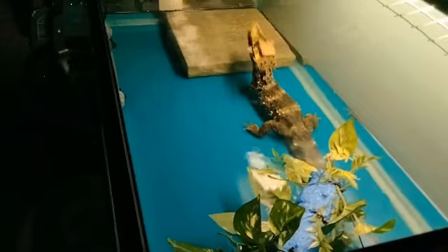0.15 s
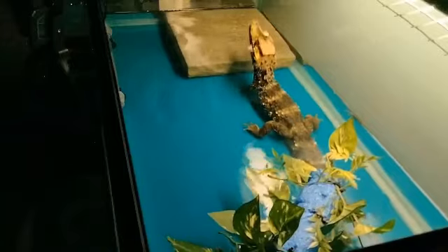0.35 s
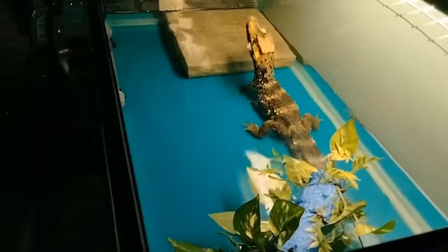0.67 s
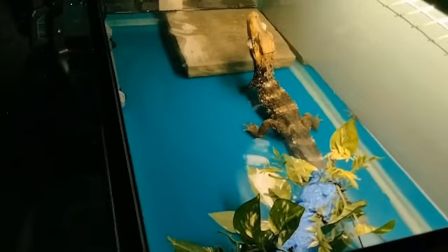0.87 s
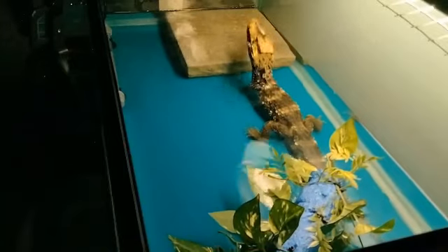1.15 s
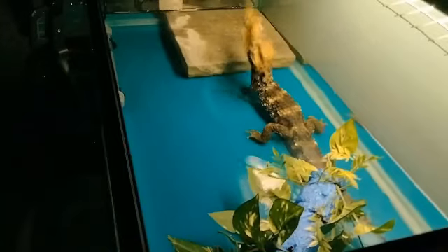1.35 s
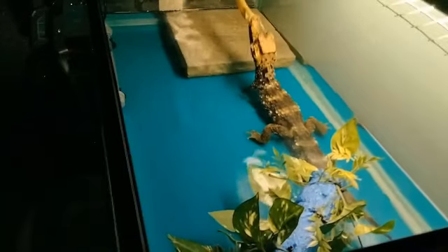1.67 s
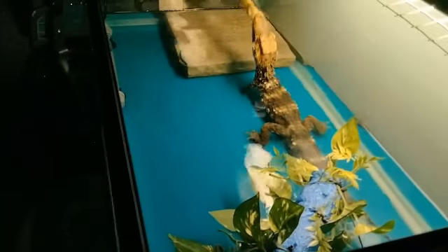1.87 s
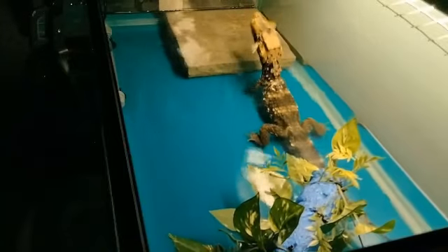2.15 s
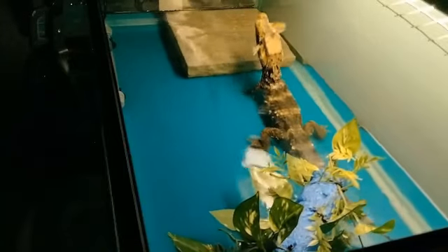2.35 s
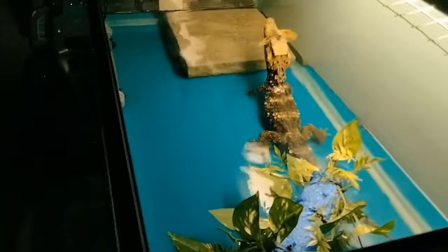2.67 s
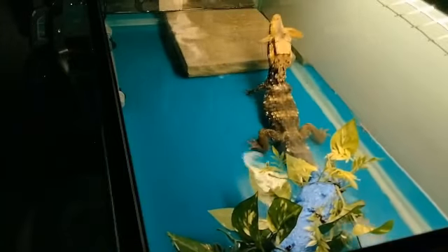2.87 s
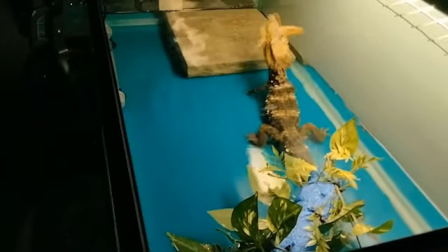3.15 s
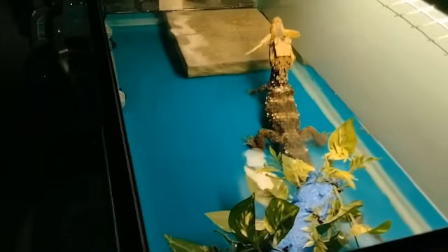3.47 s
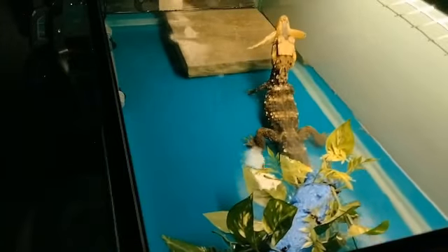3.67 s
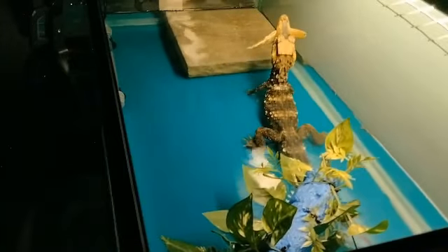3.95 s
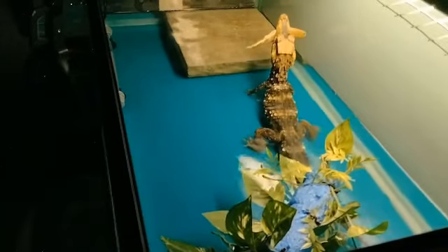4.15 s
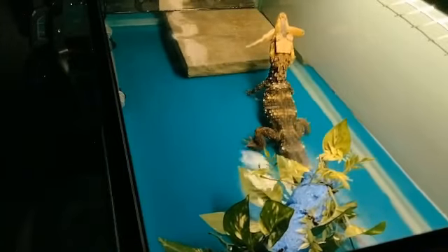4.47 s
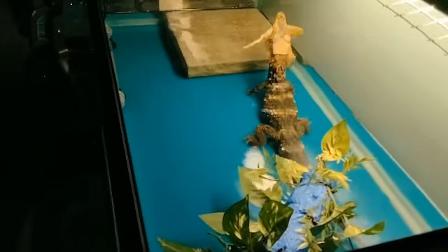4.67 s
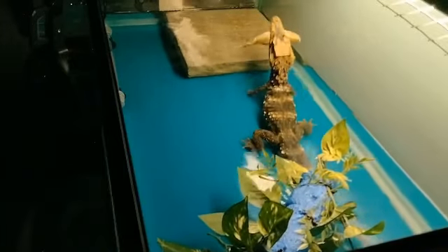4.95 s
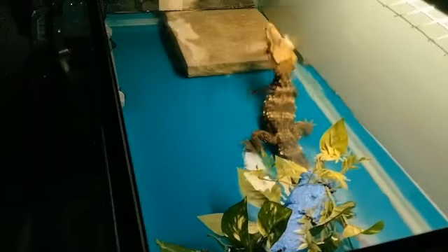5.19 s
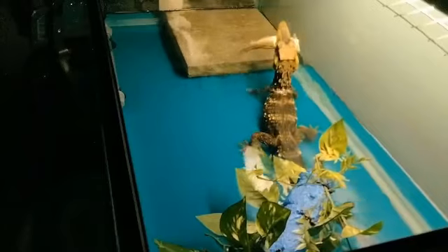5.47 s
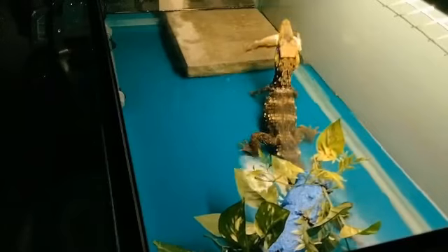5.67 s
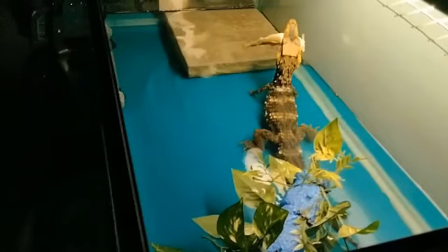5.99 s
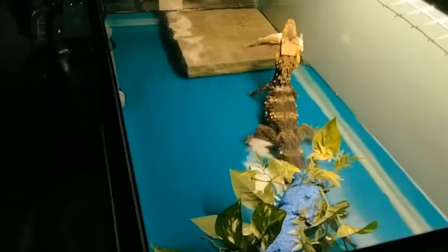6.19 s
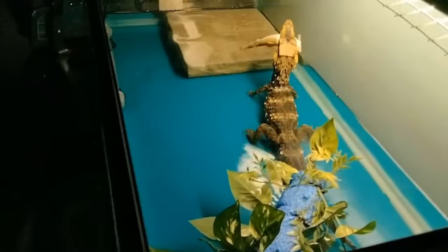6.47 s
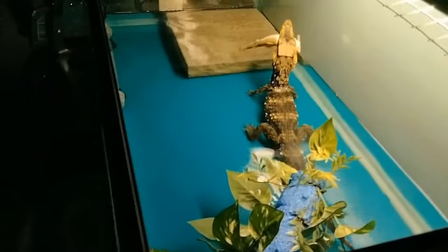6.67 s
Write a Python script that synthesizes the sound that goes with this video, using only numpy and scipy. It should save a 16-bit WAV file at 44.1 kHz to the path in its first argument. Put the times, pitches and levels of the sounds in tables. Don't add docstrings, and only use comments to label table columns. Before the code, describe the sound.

A small crocodilian crunches a fish in a shallow indoor tank. One loud dry crack comes early, a cluster of sharp snaps and crunch midway, and a last crunch near the end, with tiny bubble plops. Steady low hum, airy hiss and faint pump whine continue; soft air puffs come in pairs. Stereo phone microphones, short hard-walled reverberation.

```python
import sys
import numpy as np
from scipy import signal
from scipy.fft import rfft, irfft, next_fast_len
from scipy.io import wavfile
from scipy.ndimage import uniform_filter1d, map_coordinates

SR = 44100
rng = np.random.default_rng(int(sys.argv[2]) if len(sys.argv) > 2 else 0)


def ratio(d):
    e = np.asarray(d, float) / 20
    return 10 ** e


def pcm_store(signal):
    levels = np.round(np.clip(np.atleast_2d(signal), -1, 1) * 32767)
    wavfile.write(sys.argv[1], SR, levels.astype(np.int16).T)


N = 301189

MAINS_HZ, FAN_HZ, PUMP_HZ = 60.0, 50.52, 29.34

# mains multiple, fan multiple, pump multiple, level/dB
HUM_TONES = [(0, 1, 0, -50.5), (0, 4, 0, -62.5), (0, 6, 0, -63), (1, 0, 0, -73), (2, 0, 0, -52.5),
             (4, 0, 0, -60.5), (6, 0, 0, -66.5), (2, 2, 0, -71), (2, 3, 0, -69.5), (2, 4, 0, -75),
             (2, 5, 0, -72), (4, -1, 0, -70.5), (4, 1, 0, -78), (0, 0, 2, -60.5), (0, 0, 8, -65),
             (0, 0, 10, -62), (0, 0, 12, -63.5)]
# f/Hz, width/Hz, level/dB
PUMP_MODES = [(2052, 10.4, 2), (2370, 17, 0), (2442, 100, -17.5), (4280, 48.6, -13)]
# f/Hz, width/Hz, level/dB
LAMP_MODES = [(9300, 120, -8.5), (9940, 90, -12), (7060, 500, -4)]
# f/Hz, level per Hz/dB
RUMBLE_SPECTRUM = [(20, -12), (50, -1.5), (100, -2), (150, -5), (260, -2.5), (400, -8), (700, -18.5),
                   (1100, -23.5), (1700, -20.5), (3000, -41)]
# f/Hz, level per Hz/dB
HISS_SPECTRUM = [(700, -14), (1800, -9), (2050, 3.5), (2450, -2), (2750, -14), (3500, 0), (4100, -5),
                 (5100, 0.5), (5700, -8), (6100, -12.5), (7000, -11), (10500, -25), (13000, -25),
                 (16000, -21.5)]
# f/Hz, correlation
ROOM_CORRELATION = [(60, 0.42), (180, 0.62), (550, 0.66), (1650, -0.069), (4970, 0.023), (15000, -0.16)]
# f/Hz, left minus right/dB
ROOM_LEAN = [(60, 1), (240, 0.5), (950, -8), (3770, -3), (15000, -5.5)]
# t/s, level/dB
MURMUR_LEVEL = [(0.0, -56), (0.7, -55.5), (1.2, -61), (2.3, -58), (3.3, -61), (3.8, -58), (4.7, -62),
                (5.3, -59), (5.6, -63), (6.83, -62)]
# f/Hz, t60/s
TANK_T60 = [(500, 0.47), (3000, 0.21), (8000, .19), (15000, 0.13)]
# t/s, peak level/dB, strongest f/Hz, left minus right/dB, tank answer/dB
TOOTH_SNAPS = [(.173, -36, 8700, -2, -8), (0.4188, -7.5, 5300, -2, -2.5), (0.421, -15.5, 9400, -12, -3.5),
               (1.0704, -48, 12000, -3, 3), (1.2244, -48, 9000, -2, -8), (2.0304, -49, 9000, -1, 2),
               (2.485, -47, 10000, -4, 4), (2.5068, -30, 5500, -4, -2), (2.5784, -17.5, 5300, 1, -4),
               (3.24, -50, 9000, -3, 2), (4.79, -43, 13400, -7, -1), (4.8267, -43, 9500, -3, 1),
               (5.5322, -27.5, 7000, -15, 5)]
# t/s, peak level/dB, strongest f/Hz, left minus right/dB, tank answer/dB
SPLINTERS = [
    (1.149, -44, 6500, 9, -12),
    (1.4293, -40, 7240, 7, 4),
    (1.47, -35.5, 5300, -3, -5),
    (2.5895, -20, 7000, 4, -8),
    (2.6466, -23.5, 7500, 1, -7),
    (3.2785, -33, 4900, 6, 2),
    (3.297, -37, 3080, 3, -6),
    (5.52, -26, 9500, -9, 2.5),
]
# f/Hz, level/dB
BONE_SPECTRUM = [(500, -36), (1500, -11.5), (2200, -10), (2800, 1.5), (3500, 0.5), (6000, 0.5),
                 (8000, -1.5), (10000, 0.5), (12000, -1), (15000, 0), (16500, -13)]
# t/s, level/dB, f/Hz, t60/s, splash share 0-1
BUBBLES = [(0.213, -39.5, 1540, 0.039, .15), (.421, -50, 1710, .08, 0.6), (.423, -51, 1000, .12, .9),
           (.423, -48.5, 613, 0.13, 0.5), (2.488, -43, 1228, 0.075, 0.53), (2.489, -50, 840, .06, .8),
           (2.577, -39, 600, 0.023, .95), (2.584, -43, 2000, .09, .9), (2.649, -47.5, 1750, 0.053, 0.6),
           (3.297, -42, 3040, 0.074, 0.45), (5.257, -45.5, 620, .11, 0.6), (5.258, -51, 1010, 0.097, 0.5),
           (5.262, -50, 415, 0.084, 0.3), (5.528, -46.5, 958, 0.052, .5), (5.521, -48, 1440, .06, .6),
           (5.575, -51, 560, 0.081, 0.6)]
# valve shuts t/s, stays open/s, level/dB
AIR_PUFFS = [
    (.73, .13, -45),
    (.965, .115, -44),
    (2.185, .12, -45),
    (2.425, .11, -44.5),
    (3.83, .135, -45),
    (4.072, .11, -44.5),
    (5.322, .125, -46.5),
    (5.56, .11, -45),
    (6.83, .11, -44),
]
# f/Hz, level/dB
PUFF_BODY_SPECTRUM = [(300, -25), (600, -12), (1750, -8), (2000, 2.5), (2700, -3), (4300, 1), (5500, -2.5),
                      (6200, -12.5), (7600, -14.5), (8200, -67)]
# f/Hz, level/dB
PUFF_JET_SPECTRUM = [(8300, -44), (9400, -8), (10500, -0.5), (11500, 11.5), (13500, 8), (15200, 12.5),
                     (16500, -20.5)]
# peak t/s, level/dB, rise/s per 20 dB, fall/s per 20 dB, left minus right/dB
GRINDING = [
    (1.43, -55, .015, .07, -2),
    (2.054, -49.5, .04, .06, -.5),
    (2.509, -44.5, .003, .11, -3),
    (2.584, -36, .005, .085, -3),
    (3.292, -42, .031, .04, -1),
    (4.868, -52.5, .09, .09, -.5),
    (5.314, -52, .1, .06, -4),
    (5.526, -33.5, .015, .072, 4),
]


def unit(x):
    return x / np.sqrt(np.mean(x ** 2) + 1e-20)


def along(points, hz):
    f, value = np.transpose(points)
    return np.interp(np.log(hz + 1), np.log(f + 1), value)


def wobble(rate):
    knots = rng.standard_normal(int(N * rate / SR) + 4)
    return map_coordinates(knots, [np.arange(N) * rate / SR])


def filtered(x, response):
    m = next_fast_len(x.shape[-1] + 8192)
    spectrum = rfft(x, m) * response(np.fft.rfftfreq(m, 1 / SR))
    return irfft(spectrum, m)[..., :x.shape[-1]]


def sides(lean_db):
    return ratio(np.array([lean_db / 2, -lean_db / 2]))


def rush(gain, correlation):
    def mid_side_gain(hz):
        angle = np.arccos(np.clip(along(correlation, hz), -1, 1)) / 2
        return gain(hz) * [np.cos(angle), np.sin(angle)]

    mid, side = filtered(rng.standard_normal((2, N)), mid_side_gain)
    return unit(np.array([mid + side, mid - side]))


def peaks(modes):
    return lambda f: sum(ratio(db) / (1 + ((f - hz) / width) ** 2) for hz, width, db in modes)


def swell(peak_s, hold_s, rise, fall):
    t = np.arange(N) / SR - peak_s
    level_db = np.minimum(rise * (t + hold_s), -fall * t)
    return ratio(np.clip(level_db, -90, 0))


def machines():
    t = np.arange(N) / SR
    tones = np.zeros((2, N))
    for mains, fan, pump, db in HUM_TONES:
        hz = mains * MAINS_HZ + fan * FAN_HZ + pump * PUMP_HZ
        lag = rng.normal(0, hz / 900) * np.array([[.5], [-.5]])
        tones += np.sqrt(2) * ratio(db) * np.sin(2 * np.pi * (hz * t + rng.random()) + lag)
    tones *= ratio(0.81 * wobble(2.84))

    throb = 1 + 0.55 * np.cos(2 * np.pi * PUMP_HZ * t)
    whine = ratio(-58.5) * throb * rush(peaks(PUMP_MODES), ROOM_CORRELATION)
    lamp = ratio(-66) * rush(peaks(LAMP_MODES), ROOM_CORRELATION)

    rumble = rush(lambda f: ratio(along(RUMBLE_SPECTRUM, f)), ROOM_CORRELATION)
    rumble = ratio(-53 + 0.29 * wobble(1.91)) * rumble
    gap = lambda f: 1 - .8 * np.exp(-((f - 8600) / 620) ** 6)
    hiss = rush(lambda f: ratio(along(HISS_SPECTRUM, f)) * gap(f), ROOM_CORRELATION)
    hiss = ratio(-51.5 + .9 * wobble(3)) * hiss
    return filtered(tones + whine + lamp + rumble + hiss, lambda f: sides(along(ROOM_LEAN, f)))


def murmur():
    s, db = np.transpose(MURMUR_LEVEL)
    lumps = ratio(np.interp(np.arange(N) / SR, s, db) - 0.5 + 2.5 * wobble(14))
    modes = lambda f: 1 / (1 + ((f - 520) / 90) ** 2) + .5 / (1 + ((f - 950) / 350) ** 2)
    return lumps * rush(modes, [(500, 0.13)])


def tank(x):
    hz, t, z = signal.stft(rng.standard_normal((2, SR // 3)), SR, nperseg=256)
    patches = uniform_filter1d(rng.standard_normal(z.shape[1:]), size=4, axis=0)
    patches = uniform_filter1d(patches, size=5, axis=1)
    walls = ratio(-60 * t / along(TANK_T60, hz)[:, None])
    room = ratio(-27 - 60 * t / 0.49) / (1 + (hz[:, None] / 1800) ** 4)
    decay = (walls + room) * ratio(3.5 * unit(patches))
    tail = signal.istft(z * decay, SR, nperseg=256)[1]
    tail = tail * np.clip(np.arange(tail.shape[1]) / SR / 0.0052, 0, 1)
    return signal.fftconvolve(x, tail / np.linalg.norm(tail[0]), axes=1)


def snaps():
    out, t = np.zeros((2, N + SR)), np.arange(SR // 40) / SR
    breaks = [(0.55, *row) for row in TOOTH_SNAPS] + [(0.18, *row) for row in SPLINTERS]
    for broad, s, db, hz, lean_db, wet_db in breaks:
        burst = rng.standard_normal((2, len(t))) * ratio(-20 * t / .002) * (1 - np.exp(-t / .0002))
        bone = lambda f: broad * ratio(along(BONE_SPECTRUM, f))
        splinter = lambda f: 1j * f * 0.26 * hz / (hz * hz - f * f + 1j * f * 0.21 * hz)
        crack = filtered(burst, lambda f: bone(f) / (1 + (f / 11000) ** 2) + splinter(f))
        crack = ratio(db + 4) * crack / np.abs(crack).max(axis=1, keepdims=True)

        walls = filtered(tank(np.ones((2, 1))), lambda f: bone(f) + .5 * np.abs(splinter(f)))
        walls = ratio(wet_db + 5) * walls * np.linalg.norm(crack) / np.linalg.norm(walls)

        start = round(s * SR)
        out[:, start:start + len(t)] += crack * sides(lean_db)[:, None]
        out[:, start:start + walls.shape[1]] += walls * sides(.5 * lean_db)[:, None]
    return filtered(out[:, :N], lambda f: sides(-2.5 * np.log2((f + 500) / 6000)))


def plops():
    out, t = np.zeros((2, N + SR)), np.arange(SR // 5) / SR
    for s, db, hz, t60, share in BUBBLES:
        band = lambda f: 1 / (1 + ((f - hz) / (.2 * hz)) ** 4)
        splash = unit(filtered(rng.standard_normal((2, len(t))), band))
        tone = np.sin(2 * np.pi * hz * t * (1 + 1.4 * t))
        plop = (1 - share) * tone + 0.96 * share * splash
        envelope = 3 * ratio(db - 60 * t / t60) * (1 - np.exp(-t / 0.003))
        start = round(s * SR)
        out[:, start:start + len(t)] += plop * envelope * sides(-3)[:, None]
    return out[:, :N] + ratio(-9) * tank(out)[:, :N]


def puffs():
    jet_db, jet_rise, jet_fall = -9, 310, 330
    body_db, body_rise, body_fall = 3.5, 150, 230
    early_s, full_share = 0.028, 0.5
    jet_gain, body_gain = np.zeros(N), np.zeros(N)
    for s, open_s, db in AIR_PUFFS:
        jet_gain += ratio(db + jet_db) * swell(s, open_s, jet_rise, jet_fall)
        body_gain += ratio(db) * swell(s - early_s, full_share * open_s, body_rise, body_fall)

    body = rush(lambda f: ratio(along(PUFF_BODY_SPECTRUM, f)), [(1000, 0.1)]) * sides(-2.6)[:, None]
    body = body * body_gain * ratio(body_db + 0.8 * wobble(25))
    jet = rush(lambda f: ratio(along(PUFF_JET_SPECTRUM, f)), [(1000, 0.14)]) * sides(-6.5)[:, None]
    jet = jet * jet_gain * ratio(1.2 * wobble(25))
    return body + jet


def grind():
    force = np.zeros((2, N))
    for s, db, rise_s, fall_s, lean_db in GRINDING:
        force += ratio(db) * swell(s, 0, 20 / rise_s, 20 / fall_s) * sides(lean_db)[:, None]
    chance, size = rng.random((2, N))
    ticks = (chance < 8000 / SR) * ratio(-2.2 * np.log(size + .03))
    grit = ticks * rng.standard_normal((2, N))
    grit = force * ratio(2.5) * unit(filtered(grit, lambda f: ratio(along(BONE_SPECTRUM, f))))
    return grit + ratio(-12.0) * tank(grit)[:, :N]


def scene():
    return machines() + murmur() + snaps() + plops() + puffs() + grind()


def top_cut(x):
    return signal.sosfilt(signal.butter(12, 15900, fs=SR, output="sos"), x)


def record(dry):
    mix = filtered(dry, lambda hz: hz < 15850)
    return top_cut(mix)


dry = scene()
out = record(dry)
pcm_store(out)
```